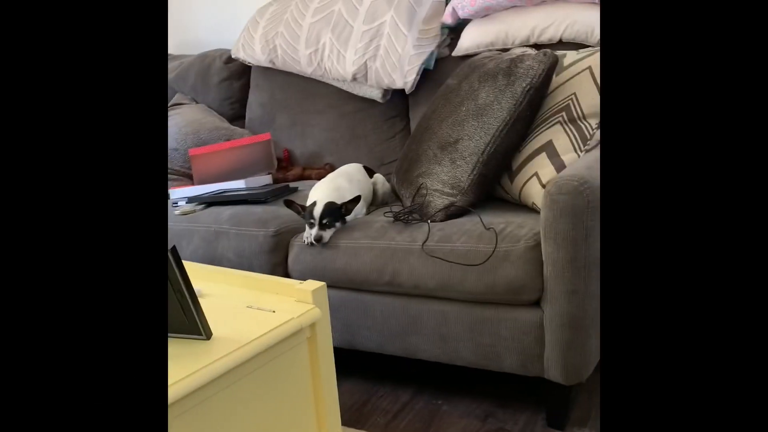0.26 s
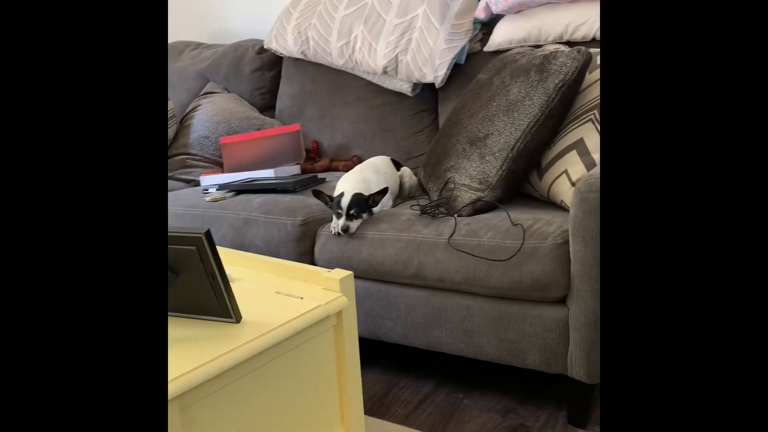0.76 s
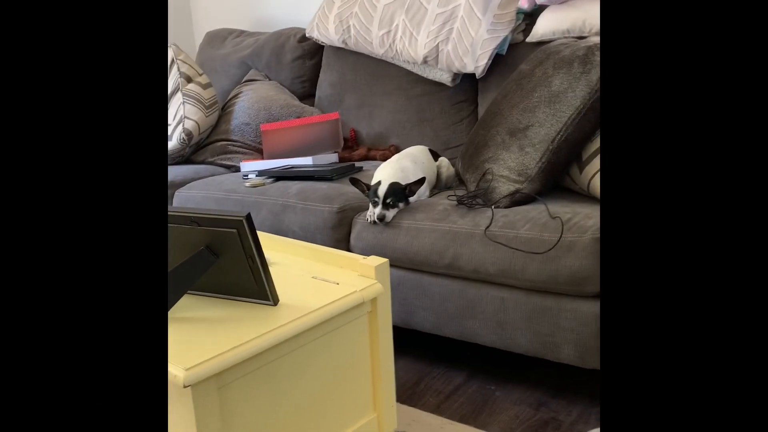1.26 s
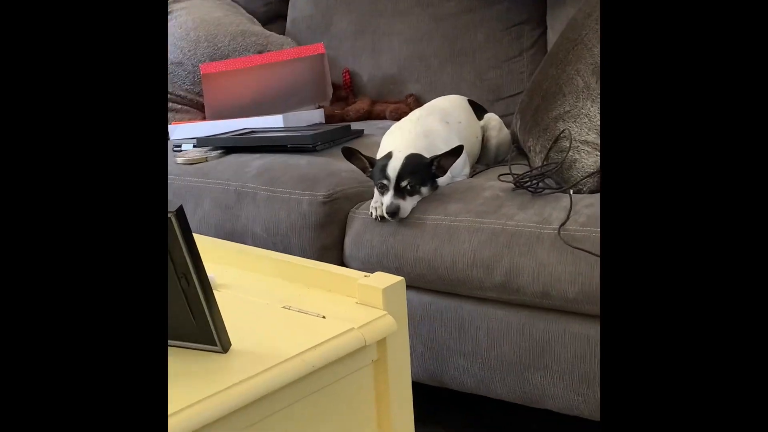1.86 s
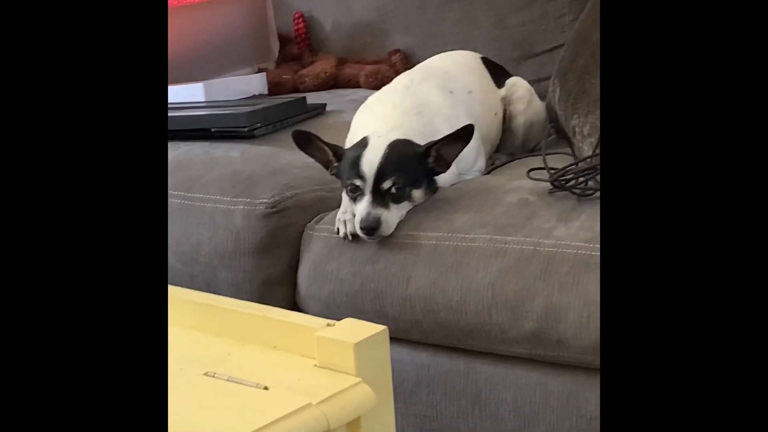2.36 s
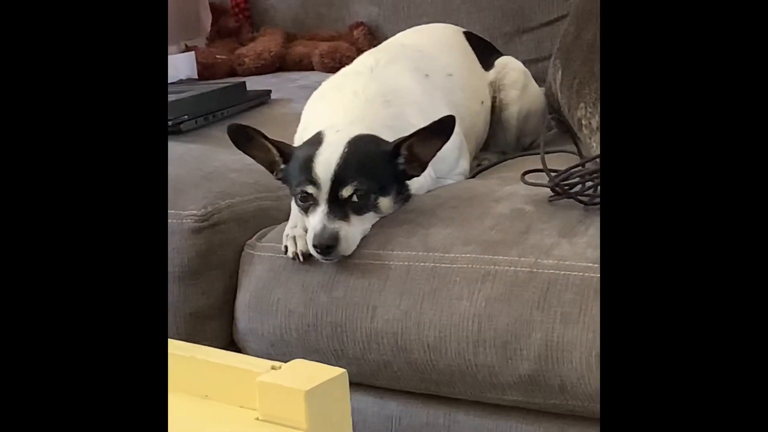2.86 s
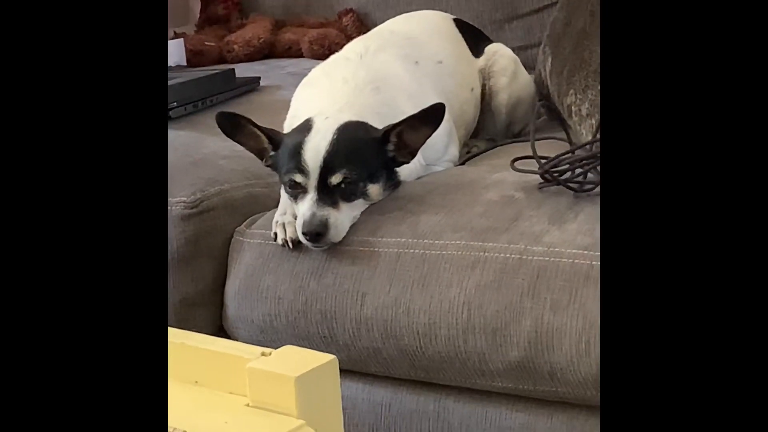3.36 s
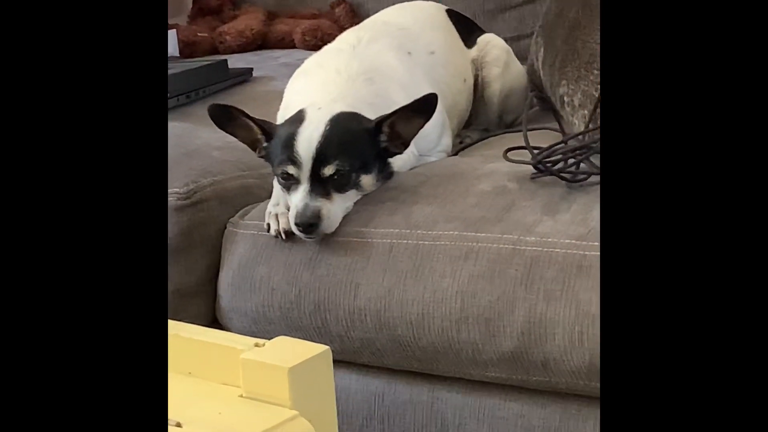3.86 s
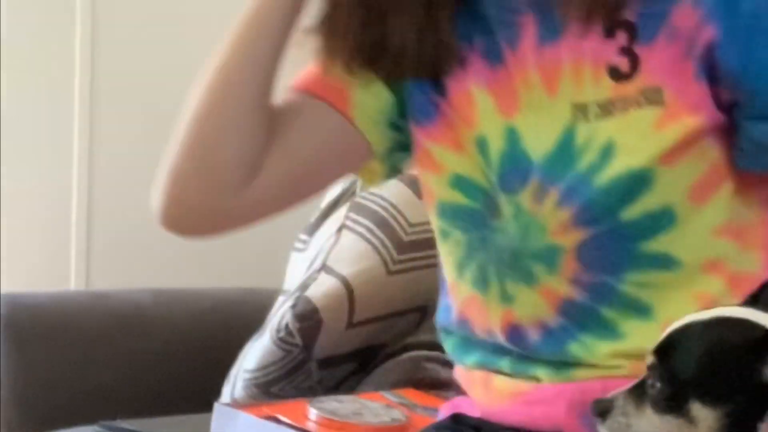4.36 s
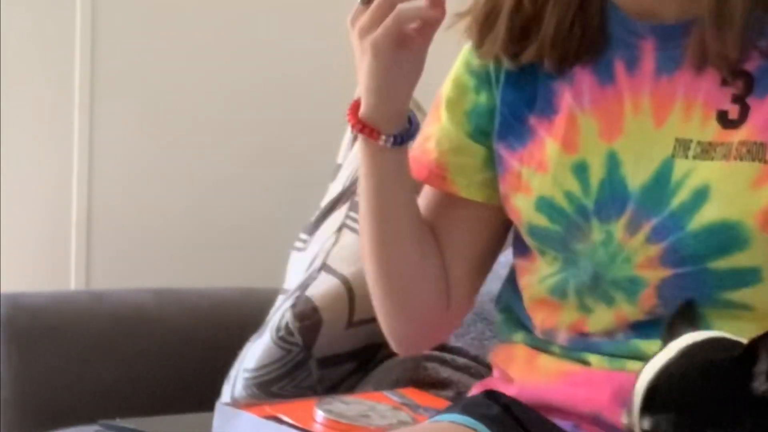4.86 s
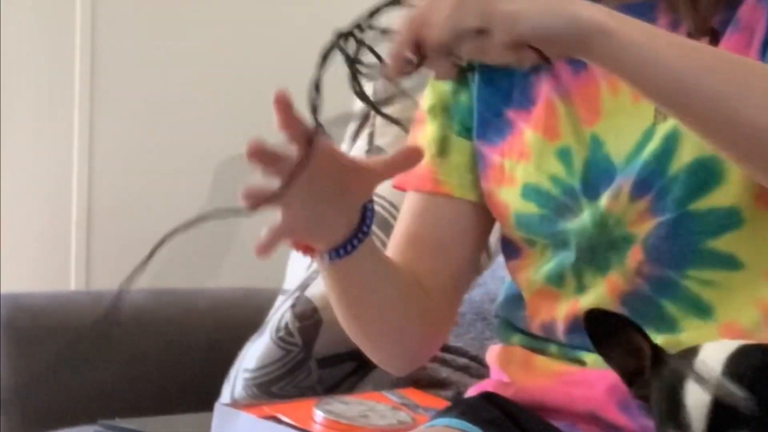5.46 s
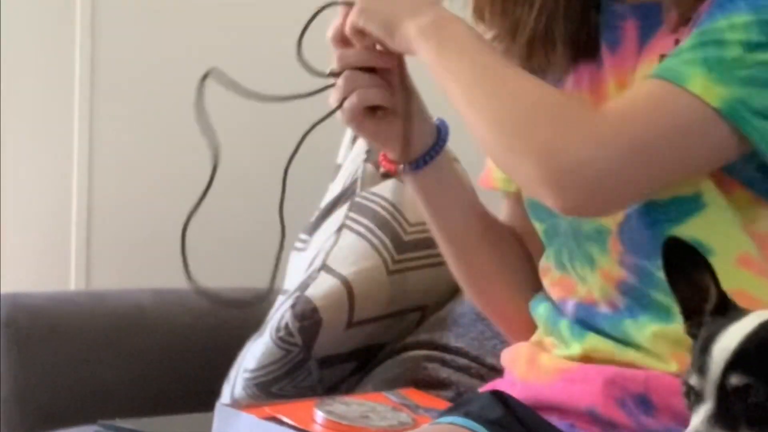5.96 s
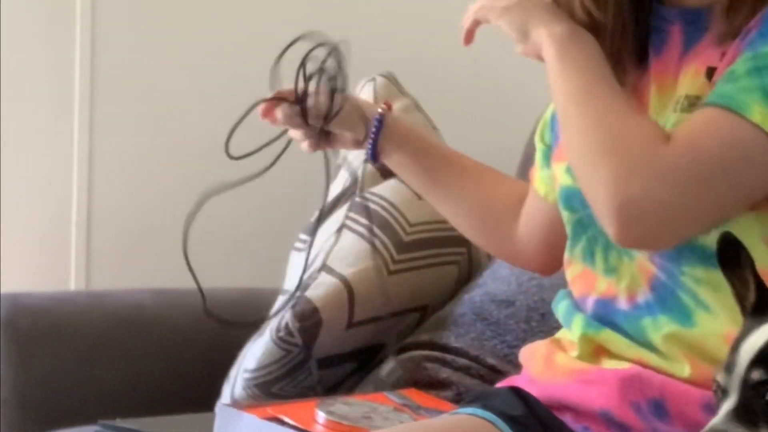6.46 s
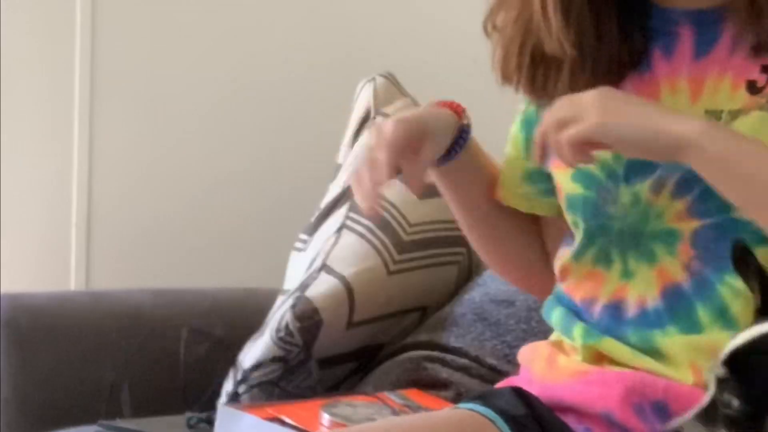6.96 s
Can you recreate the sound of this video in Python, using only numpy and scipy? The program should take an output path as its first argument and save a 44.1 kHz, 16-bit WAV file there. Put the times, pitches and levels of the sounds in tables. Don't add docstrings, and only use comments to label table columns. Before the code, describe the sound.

Steady turbulent vacuum noise, coloured by hose resonances, mains buzz and fan whine, fills a furnished room in wide stereo. After a muffled floor thud it stops abruptly. The same kind of room at rest follows: soft low beating hum, faint fabric rustles, little ticks, tiny cord squeaks. A sudden bright, very loud clack with a brief tinny ring breaks the hush, followed by a weaker double bounce and fading cloth rustle.

```python
import sys
import numpy as np
from scipy import signal
from scipy.fft import rfft, irfft
from scipy.io import wavfile
from scipy.ndimage import uniform_filter1d

SR = 44100
rng = np.random.default_rng(int(sys.argv[2]) if len(sys.argv) > 2 else 0)


def int16_out(signal):
    q = np.round(np.clip(np.atleast_2d(signal).T, -1, 1) * 32767)
    wavfile.write(sys.argv[1], SR, q.astype(np.int16))


def volts(x):
    e = np.asarray(x, float) / 20
    return 10 ** e


N = 317254
T = np.arange(N) / SR

# (frequency [Hz], density [dB per Hz])
ROOM_SPECTRUM = [(25, -36), (50, -2.5), (85, 1), (165, -1.5), (250, -9), (400, -12), (630, -18.5),
                 (1000, -27), (2000, -36), (3200, -43), (5500, -44.5), (7500, -56.5), (11000, -53.5),
                 (15600, -60)]
# (frequency [Hz], level [dB], in step at [s])
HUM_RUNNING = [(54.84, -47.5, 1.95), (53.96, -55.1, 2.367), (52.7, -59.2, 1.779), (59.05, -61.2, 2.065),
               (48.66, -61.0, 2.008)]
# (frequency [Hz], level [dB], in step at [s])
HUM_RESTING = [(54.72, -45.6, 5.6), (59.05, -54.6, 5.645), (52.91, -58.9, 5.563), (57.4, -61.9, 5.758)]
# (frequency [Hz], 60 dB decay time [s])
WALL_DECAY = [(300, 0.24), (1500, 0.26), (4000, 0.29), (8000, 0.16), (15000, 0.19)]
# (frequency [Hz], density [dB per Hz])
CLOTH_SPECTRUM = [(300, -1), (800, 2), (1500, 0.5), (2500, -3.5), (3500, -11), (5500, -3.5), (7500, -13.5),
                  (10000, -18), (12500, -23), (15600, -24)]
# (peak time [s], level [dB], treble [dB], rise [s], fall [dB per s])
CLOTH_STROKES = [(4.1, -71, -3.5, .1, 24), (4.2, -72, -11, .02, 152), (4.43, -72, -17, 0.22, 72),
                 (4.68, -78, -7, .05, 60), (4.87, -72, -9, .2, 70), (5.06, -72, -6, .05, 83),
                 (5.145, -65, -4, .008, 48), (5.18, -67, -2.5, 0.064, 72), (5.39, -78, -4, .03, 150),
                 (5.533, -61.5, -13, 0.014, 86), (5.81, -74, -20, .05, 150), (6.14, -68.5, -18, .3, 26),
                 (6.275, -63.5, -4, 0.019, 90), (6.56, -52.5, -2.5, .01, 49), (6.76, -54.5, -7, .01, 100),
                 (6.85, -57.5, -17, .1, 54), (6.98, -72, 5, 0.067, 99), (7.016, -55, -10, 0.032, 178)]
# (time [s], level [dB])
SEAM_TICKS = [
    (4.069, -66),
    (4.472, -82),
    (4.62, -66),
    (4.764, -59),
    (5.457, -67),
]
# (time [s], level [dB], centre [Hz], fall [ms])
BEAD_SNAPS = [(4.009, -61, 6990, 1.9), (4.196, -59, 1500, 7.1), (4.865, -66, 11000, 1.3),
              (5.14, -60, 5000, 2), (5.527, -61, 4500, 2), (6.267, -56, 6000, 2.3), (6.2, -73, 11500, 2.9),
              (6.5035, -17, 9100, 1.5), (6.506, -29, 1820, 12.5), (6.5095, -24, 11000, 3.2),
              (6.6975, -35, 3500, 2.2), (6.702, -32, 3000, 11), (6.726, -28.5, 4970, 0.76),
              (6.731, -43.5, 7960, 6), (6.829, -59, 3500, 15), (7.012, -59, 1970, 14)]
# (time [s], level [dB], ring [Hz], fall [ms])
BEAD_KNOCKS = [(5.527, -55.5, 2580, 33), (6.27, -61, 6500, 30), (6.272, -60, 10500, 17),
               (6.494, -49, 5800, 9.4), (6.509, -19.5, 6060, 1.55), (6.513, -31, 6700, 4.7),
               (6.524, -51, 5960, 6.6), (6.524, -55, 2100, 10), (6.534, -50, 496, 2.5),
               (6.708, -41, 2600, 10), (6.7247, -32, 1690, 3.35), (6.73, -37, 1670, 7)]
# (time [s], level [dB], ring [Hz], fall [ms])
CORD_SQUEAKS = [
    (6.03, -69, 3250, 29.5),
    (6.14, -70, 2590, 28),
]
# (frequency [Hz], level [dB], 60 dB decay time [s])
LID_MODES = [(1090, -5, .08), (1480, -5, .08), (2065, -6, .07), (3130, -6, .07), (3270, -6, .08),
             (3860, -6, .1), (5780, -7, .06), (5960, -5, .08), (6100, -7, .06), (6700, -10, .06),
             (8030, -9, .03)]
# (frequency [Hz], level [dB], waver [Hz], flutter [dB])
MOTOR_TONES = [
    (120.3, -41, .05, 1.1),
    (625, -45.5, .3, 1.1),
    (4375, -51, 2.5, 1.3),
]
# (time [s], nozzle hiss level [dB], hose roar [dB])
HEAD_MOTION = [(0.0, -42.5, 8.5), (0.3, -41.5, 9), (0.8, -40.5, 8.5), (1.4, -40, 7), (1.95, -40, 7),
               (2.15, -40, 9), (2.8, -40, 8.5), (3.5, -40.5, 7.5), (3.91, -40, 8)]
# (frequency [Hz], density [dB per Hz])
AIR_SPECTRUM = [(25, -36), (50, -2), (90, -2), (170, 0.5), (260, -3.5), (500, -4), (1100, -2), (1900, -1),
                (3150, -4.5), (3800, -9.5), (5200, -8.5), (6500, -11.5), (10000, -14.5), (15600, -24.5)]
# (frequency [Hz], width [Hz], lift [dB])
HOSE_MODES = [(333.6, 47, 5), (456, 110, 5), (779, 30, 6), (938.7, 25, 10.5), (1135, 90, 5), (1308, 49, 7),
              (1613, 32, 4.5), (1770, 51, 7.5), (2208, 25, 9.5), (2960, 100, 5), (2970, 54, 0.5),
              (3400, 56, 4.5)]
# (frequency [Hz], likeness [0-1], right lead [rad], left-right [dB])
PORTS_RUNNING = [(100, .999, 0, .6), (400, .9, -.3, 2.4), (650, .2, -1.2, 6), (950, .58, -.5, .8),
                 (1600, .42, -.9, .6), (2150, .12, -2.2, 1.1), (2400, .4, -3.1, .8), (3000, .68, -2.9, .6),
                 (3800, .52, -2, .4), (4350, .86, -2.55, .2), (4800, .98, -3.14, 0), (6900, .998, -6.28, 0),
                 (8950, .998, -9.42, 0), (16000, .998, -20.2, 0)]
# (frequency [Hz], likeness [0-1], right lead [rad], left-right [dB])
PORTS_RESTING = [(100, .999, 0, -.4), (350, .85, -.2, -.9), (750, .28, -1.8, -1.5), (1200, .35, -3.2, -.3),
                 (1600, .25, -4.3, 0), (2500, .7, -3.9, .3), (3600, .58, -3.7, -.6), (4200, .95, -3.25, 0),
                 (4850, .985, -2.95, 0), (8400, .99, 0, 0), (16000, .99, 5.7, 0)]


def evened(x):
    return x / np.sqrt(np.mean(x ** 2) + 1e-20)


def read(points, hz):
    f, value = np.transpose(points)
    return np.interp(np.log(hz + 1), np.log(f + 1), value)


def drift(hz, count):
    low_pass = signal.butter(2, hz, fs=SR, output="sos")
    noise = rng.standard_normal(count + SR)
    return evened(signal.sosfilt(low_pass, noise)[SR:])


def resonate(x, hz, width):
    pole = np.exp((2j * np.pi * hz - np.pi * width) / SR)
    return 2 * signal.lfilter([1 - abs(pole)], [1, -pole], x).real


def hiss(shape_db, size, patchy_db, tall, long, ripple_db):
    hop = size // 4
    frames, hz = N // hop + 5, np.fft.rfftfreq(size, 1 / SR)
    a, b, c, d, patches, ripple = rng.standard_normal((frames, len(hz), 6)).T
    patches = uniform_filter1d(patches, tall, 0)
    patches = evened(uniform_filter1d(patches, long, 1))
    ripple = evened(uniform_filter1d(ripple, size=60, axis=1))
    field_db = shape_db(hz[:, None], np.arange(frames) * hop / SR)
    field = volts(field_db + patchy_db * patches + ripple_db * ripple)
    noises = np.array([a + 1j * b, c + 1j * d])
    return signal.istft(noises * field, nperseg=size, noverlap=size - hop)[1][:, :N]


def ports(pair, table):
    hz = np.fft.rfftfreq(N, 1 / SR)
    f, *columns = np.transpose(table)
    same, lead, balance_db = (np.interp(hz, f, c) for c in columns)
    same = np.clip(same, 0, 1)
    left, other = rfft(pair)
    right = same * np.exp(1j * lead) * left + np.sqrt(1 - same ** 2) * other
    tilt = volts(balance_db / 2)
    return irfft(np.array([left * tilt, right / tilt]), N)


def room():
    noise = hiss(lambda hz, t: read(ROOM_SPECTRUM, hz), size=2048, patchy_db=1.6, tall=6, long=8, ripple_db=2.5)
    return volts(-45) * evened(noise)


def rumble(tones):
    main_hz = tones[0][0]
    waver = 2 * np.pi * np.cumsum(0.34 * drift(9.6, N)) / SR
    hum = np.zeros(N)
    for hz, db, in_step_s in tones:
        cycles = main_hz * T + (hz - main_hz) * (T - in_step_s)
        hum += volts(db) * np.sin(2 * np.pi * cycles + waver)
    mode_hz, mode_width_hz, mode_db = 55, 8, -56
    mode = resonate(rng.standard_normal(N), mode_hz, mode_width_hz)
    mode = resonate(mode, mode_hz, mode_width_hz)
    return np.sqrt(2) * hum + volts(mode_db) * evened(mode)


def walls(x):
    taps = np.zeros((2, SR // 2))
    at = np.arange(200, SR // 2 - 20, 20)
    at = at + rng.integers(0, 20, (2, len(at)))
    np.put_along_axis(taps, at, rng.choice([-1., 1.], at.shape), 1)
    hz, t, z = signal.stft(taps, SR, nperseg=256)
    decay = volts(-60 * t / read(WALL_DECAY, hz)[:, None])
    tail = signal.istft(z * decay, SR, nperseg=256)[1]
    return signal.fftconvolve(x[None], tail / np.linalg.norm(tail[0]), axes=1)[:, :N]


def rustle():
    s, db, treble_db, rise, fall = np.transpose(CLOTH_STROKES)[:, :, None]
    coarse = T[::64]
    late = coarse - s
    drop_db = np.where(late < 0, -22 * late / rise, fall * late)
    treble_drop_db = drop_db + 0.58 * fall * np.maximum(late, 0)
    floor_db = -91
    low = np.sqrt(np.sum(volts(db - drop_db) ** 2, 0) + volts(floor_db) ** 2)
    high = np.sqrt(np.sum(volts(db + treble_db - treble_drop_db) ** 2, 0) + volts(floor_db - 5) ** 2)
    tilt_db = 20 * np.log10(high / low)

    def shape_db(hz, t):
        treble_share = np.clip((hz - 3200) / 2200, 0, 1)
        return read(CLOTH_SPECTRUM, hz) + treble_share * (np.interp(t, coarse, tilt_db) + 3)
    body = hiss(shape_db, size=256, patchy_db=3.0, tall=5, long=12, ripple_db=2.4)
    slips = volts(0.19 * drift(150, N))
    return volts(-2) * np.interp(T, coarse, low) * slips * body


def contacts(rows, width_share, rise_share):
    out, t = np.zeros(N + SR), np.arange(SR // 3) / SR
    for s, db, hz, fall_ms in rows:
        width, rise_ms = width_share * hz, rise_share * fall_ms
        contact = (1 - np.exp(-1000 * t / rise_ms)) * np.exp(-1000 * t / fall_ms)
        scrape = rng.standard_normal(len(t))
        scrape[round(rise_ms * SR / 1000) + 1] = -4
        ring = resonate(scrape, hz, width)
        ring = contact * resonate(ring, hz, width * 1.7)
        out[round(s * SR):][:len(t)] += volts(db + 8.5) * ring / abs(ring).max()
    return out[:N]


def lid(hits):
    t = np.arange(SR // 3) / SR
    ring = sum(volts(db - 60 * t / t60) * np.sin(2 * np.pi * hz * t) for hz, db, t60 in LID_MODES)
    on_lid = (T > 6.5) * (T < 6.54)
    blows = abs(hits) * rng.standard_normal(N) * on_lid
    return volts(-36) * signal.fftconvolve(blows, ring)[:N]


def clacks():
    seams = [(s, db, 850, 3.8) for s, db in SEAM_TICKS]
    hits = contacts(seams + list(BEAD_SNAPS), width_share=1.26, rise_share=0.078)
    hits += contacts(BEAD_KNOCKS, width_share=0.38, rise_share=.22)
    hits += contacts(CORD_SQUEAKS, width_share=0.017, rise_share=.1)
    return hits + lid(hits)


def bump():
    swell = np.exp(-(1000 * (T - 3.26) / 28) ** 2)
    return volts(-30.5) * swell * np.sin(2 * np.pi * 85 * T)


def motor():
    out = np.zeros((2, N))
    for hz, db, waver_hz, flutter_db in MOTOR_TONES:
        turn = 2 * np.pi * np.cumsum(hz + waver_hz * drift(2.5, N)) / SR
        level = np.sqrt(2) * volts(db + flutter_db * drift(4.7, N))
        out += level * np.array([np.sin(turn), np.cos(turn)])
    return out


def air():
    s, level_db, roar_db = np.transpose(HEAD_MOTION)
    roar_db = np.interp(T, s, roar_db - roar_db.mean())
    wander_db = .4
    hose_db = roar_db + wander_db * drift(6.1, N)
    brush_db = .8 * roar_db + wander_db * drift(6.1, N)

    def shape_db(hz, t):
        modes = sum(db / (1 + (2 * (hz - f) / width) ** 2) for f, width, db in HOSE_MODES)
        hose = np.exp(-((hz - 1200) / 900) ** 2) * np.interp(t, T, hose_db)
        brush = np.exp(-((hz - 2900) / 800) ** 2) * np.interp(t, T, brush_db)
        return read(AIR_SPECTRUM, hz) + modes + hose + brush
    flow = hiss(shape_db, size=2048, patchy_db=1.5, tall=7, long=9, ripple_db=2.44)
    return volts(14 + np.interp(T, s, level_db)) * evened(flow)


def scene():
    hits = clacks()
    near = hits * volts([[0], [-5]]) + volts(-3.5) * walls(hits)
    resting = ports(room() + rumble(HUM_RESTING) + rustle() + near, PORTS_RESTING)
    running = ports(air() + motor() + bump() + rumble(HUM_RUNNING), PORTS_RUNNING)
    fade_out = np.interp(T, (3.914, 3.95), [1, 0])
    fade_in = np.interp(T, (3.95, 3.985), [0, 1])
    return running * fade_out + resting * fade_in


def top_cut(x):
    return signal.sosfilt(signal.butter(12, 16530, fs=SR, output="sos"), x)


def record(dry):
    high_pass = signal.butter(2, 34, "high", fs=SR, output="sos")
    low_pass = signal.firwin(511, 15850, window=("kaiser", 9), fs=SR)
    cut = signal.sosfilt(high_pass, dry)
    mix = signal.oaconvolve(cut, low_pass[None], "same")
    return top_cut(mix)


dry = scene()
out = record(dry)
int16_out(out)
```